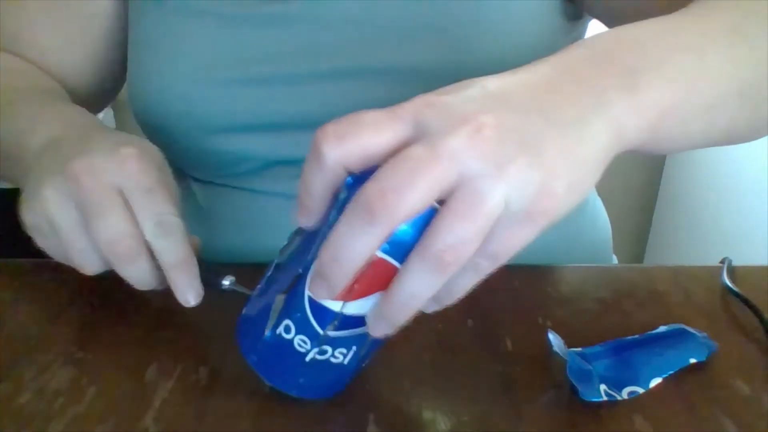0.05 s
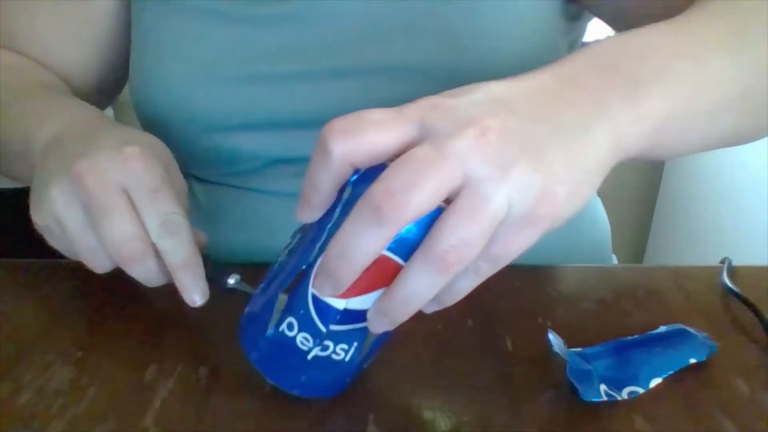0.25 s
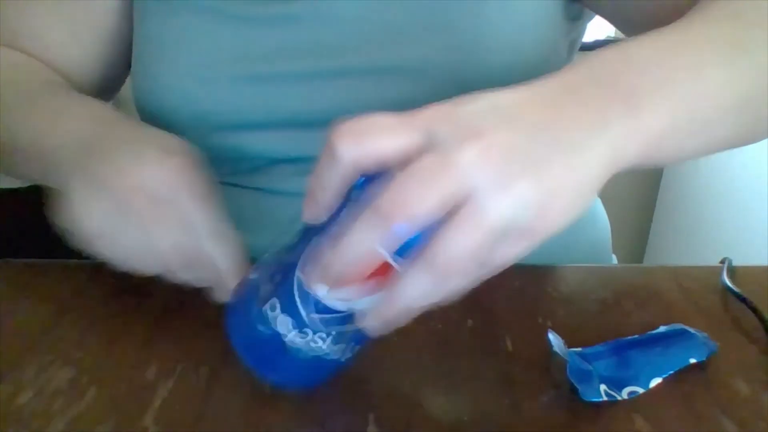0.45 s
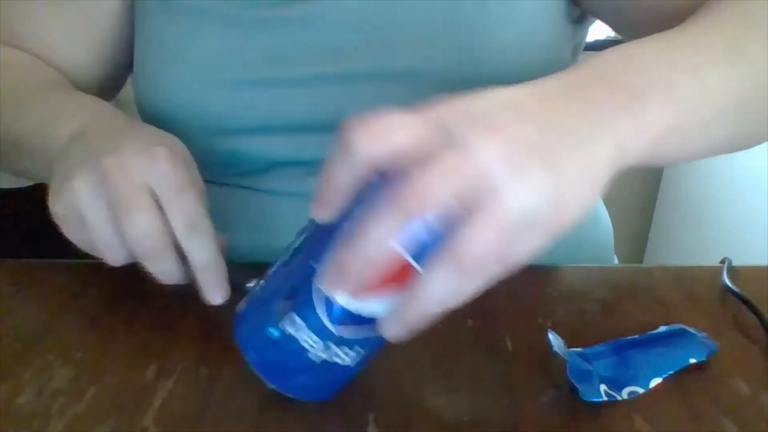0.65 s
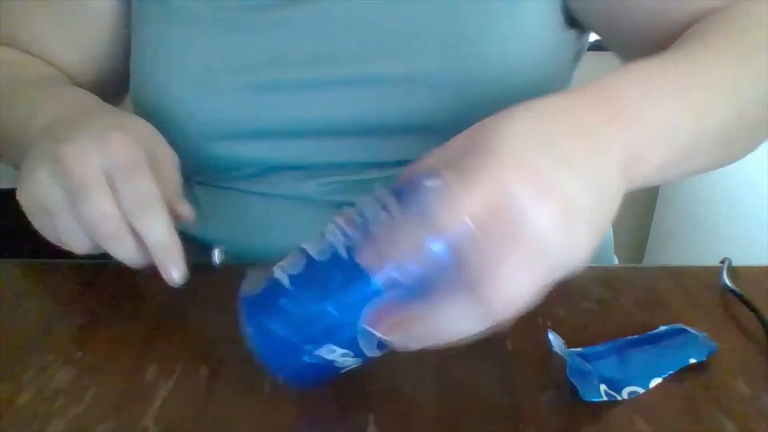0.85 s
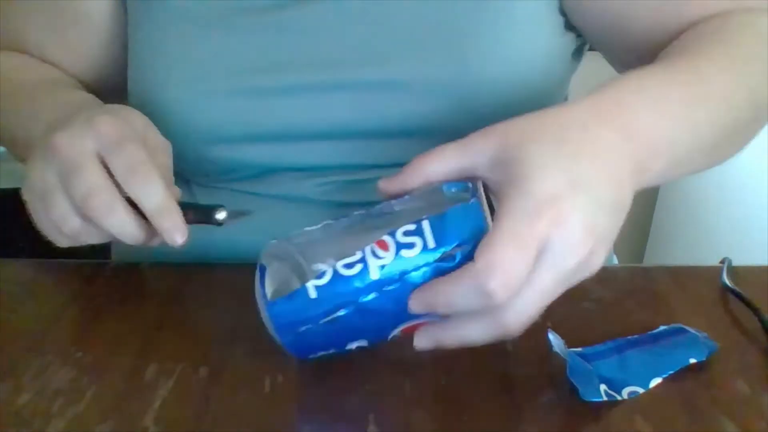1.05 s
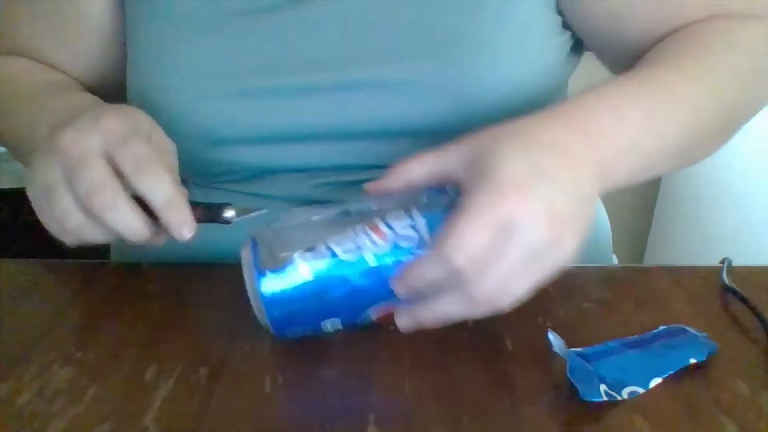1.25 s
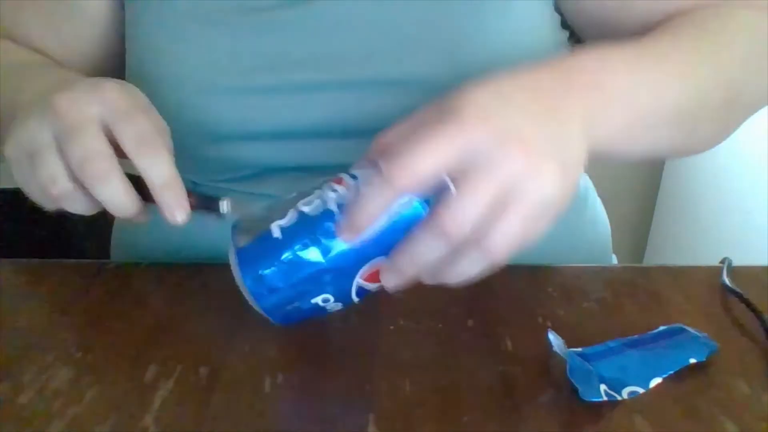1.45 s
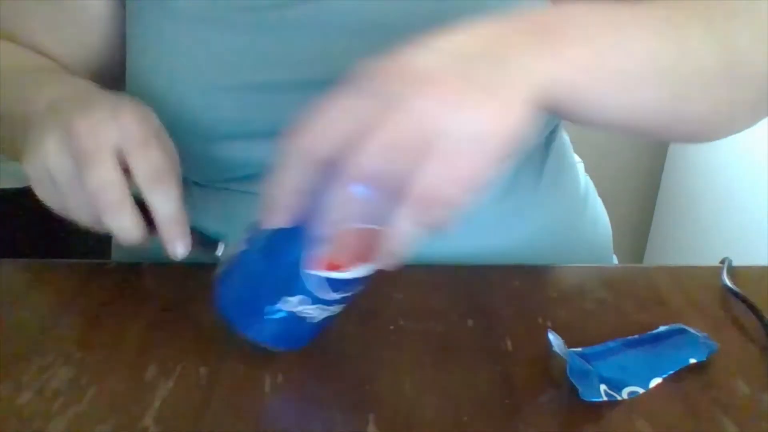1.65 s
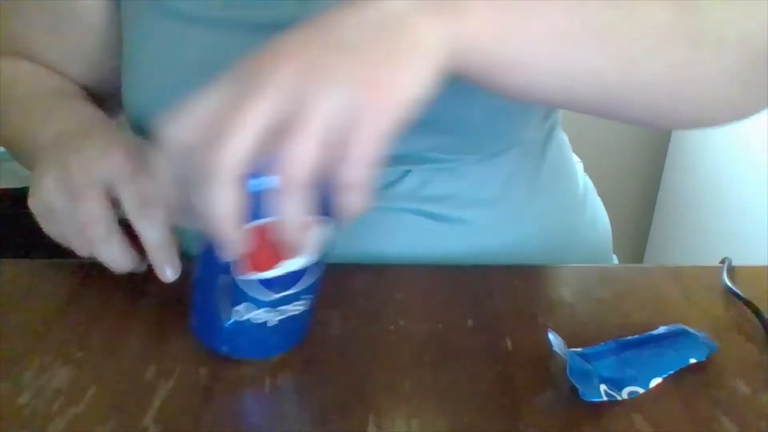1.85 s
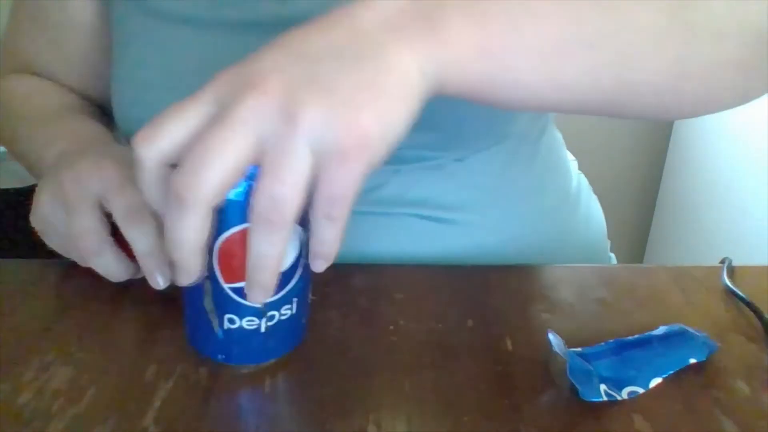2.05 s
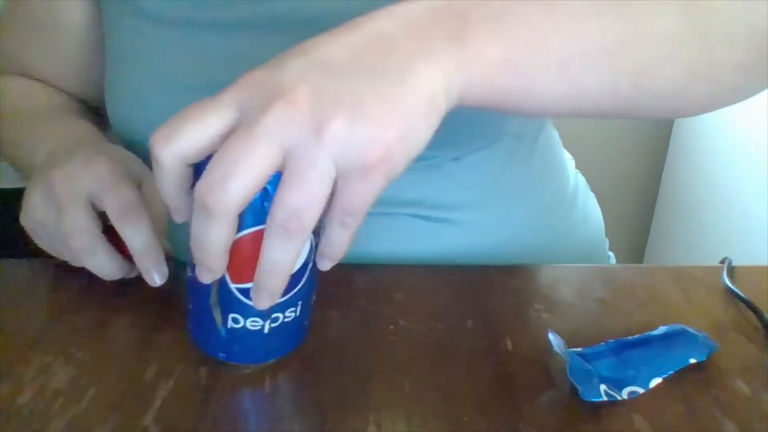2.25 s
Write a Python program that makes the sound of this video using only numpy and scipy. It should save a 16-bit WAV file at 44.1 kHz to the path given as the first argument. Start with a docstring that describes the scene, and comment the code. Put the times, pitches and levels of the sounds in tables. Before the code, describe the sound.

Close to the microphone in a quiet room, a cut-open metal can crackles and pops under a hand. Ringing taps and a few small clicks follow, then another crackle and a knock as it is stood on a wooden table.

```python
"""A faint hiss, an earlier hit dying away, lies over a low rumble; then comes a burst of sharp snaps.
An empty, cut-open drink can is squeezed and turned over on a wooden table in a quiet room,
close to one microphone. Its thin wall buckles, popping dents and a light click by the rim ring
briefly, and taps set the whole shell ringing. The can bumps the table and is set upright with a
thin swish of its rim. The room's tail and the rumble fade out at the end."""
import sys
import numpy as np
from scipy import signal
from scipy.fft import rfft, irfft, next_fast_len
from scipy.io import wavfile

SR = 44100
rng = np.random.default_rng(int(sys.argv[2]) if len(sys.argv) > 2 else 0)


def transcribe(signal):
    """Save signal, clipped to [-1, 1], as a 16-bit WAV file at the path in sys.argv[1]."""
    frames = np.atleast_2d(signal).T
    limited = np.clip(frames, -1, 1)
    pcm = np.round(limited * 32767).astype(np.int16)
    wavfile.write(sys.argv[1], SR, pcm)


N = 101429
TIME = np.arange(N) / SR

# The faint hiss of dying hits in the room. Each row: time in seconds, level in dB.
HISS_LEVELS = [(0, -42), (.03, -42), (.12, -52.5), (.2, -55.5), (.6, -43), (.72, -51.5), (.95, -53.5),
               (1.1, -61.5), (1.2, -69), (1.4, -60.5), (1.65, -65.5), (1.9, -63), (2.0, -61), (2.08, -75.5),
               (2.19, -79.5), (2.21, -110)]
# Colour of the hiss. Each row: frequency in Hz, relative level in dB.
HISS_SPECTRUM = [(300, -7.5), (600, -14.5), (950, 1), (1800, 1.5), (2800, -1.5), (4200, -5.5), (5600, -5.5),
                 (7000, -8), (7900, -21)]
# The low rumble. Each row: time in seconds, level in dB.
RUMBLE_LEVELS = [(0, -65.5), (.2, -54), (.5, -53.5), (.66, -52.5), (.8, -57.5), (1.03, -45.5), (1.1, -52.5),
                 (1.16, -50), (1.3, -53.5), (1.7, -58), (1.87, -54), (2.03, -63.5), (2.18, -65.5),
                 (2.205, -110)]
# Colour of the rumble. Each row: frequency in Hz, relative level in dB.
RUMBLE_SPECTRUM = [(25, -34.5), (60, -29.5), (90, -18), (125, 2.5), (190, 3), (290, 2.5), (400, -12),
                   (700, -12), (1200, -42)]
# The wall buckles. Each row: start in seconds, then relative levels in dB of four registers:
# hollow body, clack, tinny ring, crack.
WALL_SNAPS = [(0.2259,-56.5,-50,-47.5,-36.5),(.2402,-29.5,-24.5,-21,-16.5),(.244,-37,-19.5,-30,-9.5),(.249,-34.5,-17,-17,-39),(.261,-51,-17.5,-15,-11.5),(.273,-20.5,-16,-18.5,-10.5),(.279,-37,-35,-10.5,-10.5),(.293,-24.5,-45,-18.5,-15),(.306,-30,-48,-14.5,-13.5),(.339,-22.5,-27.5,-23,-29),(.368,-32,-37,-27.5,-49),(.392,-47,-52,-37.5,-56.5),(.421,-35.5,-33.5,-36,-36.5),(.462,-28,-24,-26,-33),(.4685,-25,-15.5,-17,-15),(.501,-25.5,-21,-15,-8),(.5457,-34.5,-37.5,-28,-24),(.5512,-37,-35.5,-24,-17),(0.646,-51,-56,-52.5,-46),(0.689,-50,-54,-57,-56),(.7474,-31.5,-23.5,-11.5,-12),(.757,-25.5,-24.5,-35.5,-30),(.775,-41.5,-32.5,-19.5,-33.5),(.789,-35,-39,-35,-39),(.955,-59,-61,-57,-51.5),(1.006,-47.5,-33.5,-49.5,-51),(1.021,-54.5,-37.5,-57,-57.5),(1.037,-64,-41.5,-46.5,-38.5),(1.073,-67.5,-58.5,-58.5,-52),(1.235,-59.5,-60,-57.5,-52),(1.2937,-59.5,-39.5,-23,-36),(1.414,-54,-39,-32.5,-43.5),(1.423,-52,-38.5,-28,-29.5),(1.427,-46,-32,-22.5,-28),(1.4329,-38,-30,-16,-19),(1.438,-29,-30,-18,-25.5),(1.451,-28,-22,-20.5,-22.5),(1.505,-19,-19.5,-29,-37.5),(1.745,-67,-53.5,-39.5,-29.5),(1.8444,-45,-45.5,-41,-50.5)]
# Those four registers. Each row: lower and upper edge in Hz, wall ring in dB, its t60 (time to
# fall 60 dB) in seconds, room tail in dB, its t60 in seconds.
SNAP_REGISTERS = [(304.6, 800, -7, .15, -35.5, 0.3), (788.4, 1600, -2, 0.17, -36, 0.68),
                  (1644.5, 5010, -4, 0.15, -25, 0.52), (4517, 7900, -8, 0.096, -38, 0.77)]
# Colour of the sheet metal. Each row: frequency in Hz, relative level in dB.
WALL_SPECTRUM = [(300, 0), (430, -6), (600, 7.5), (780, 4), (930, 1.5), (1200, 7), (1500, -1), (1700, 4.5),
                 (2050, 7.5), (2600, 8), (3050, 1), (3650, 6), (4150, -4.5), (4900, -6.5), (5600, -1),
                 (6500, -4), (7200, -9), (7700, -21.5), (7900, -23.5)]
# Brief pitched rings of the can. Each row: start in seconds, pitch in Hz, level in dB, t60 in seconds.
PITCHED_RINGS = [(.244, 1541, -14, .16), (.248, 3205, -5.5, 0.049), (.262, 4905, -21.5, 0.28),
                 (.273, 1415, -24.5, 0.19), (.28, 6260, -18, 0.13), (.28, 5580, -20.5, 0.15),
                 (.281, 2170, -21.5, 0.29), (.272, 1115, -19, 0.2), (.274, 1180, -28, .18),
                 (.279, 2045, -6.5, 0.051), (.281, 2590, -29.5, .28), (.305, 3620, -23, 0.17),
                 (.326, 1956, -20.5, .3), (.339, 1885, -25.5, 0.29), (.34, 2170, -25.5, .22),
                 (.341, 1760, -30.5, 0.41), (.342, 790, -36, 0.33), (.4665, 930, -15, .17),
                 (.469, 1130, -9, 0.063), (.4695, 1031, -23.5, .24), (.501, 6710, -4, 0.031),
                 (.5015, 6090, -5.5, 0.021), (.502, 3616, -22.5, .16), (.5015, 1878, -25.5, 0.31),
                 (.503, 2190, -28, 0.24), (.5515, 4900, -30, 0.13), (.5515, 5540, -28.5, .14),
                 (1.007, 1136, -31.5, 0.2), (1.008, 1433, -30, 0.099), (1.294, 3628, -21, 0.088),
                 (1.294, 2320, -32, 0.26), (1.294, 2290, -31, 0.16), (1.294, 1256, -35.5, 0.24),
                 (1.294, 1474, -32.5, 0.23), (1.294, 2620, -36, 0.19), (1.294, 5540, -39.5, 0.19),
                 (1.433, 1119, -21.5, 0.27), (1.4345, 586.4, -21.5, 0.28), (1.4385, 1478, -16, .13),
                 (1.451, 633, -27, 0.28), (1.4512, 2374, -18, 0.124), (1.846, 2525, -38.5, .13)]
# The can bumps the table. Each row: start in seconds, strength in dB, contact time in seconds.
TABLE_BUMPS = [(.259, -15, 0.0022), (.2755, -13, 0.00095), (.291, -14, 0.0056), (.364, -18.5, 0.0062),
               (.48, -35, .0015)]
# Modes of the wooden table. Each row: pitch in Hz, relative level in dB, t60 in seconds.
TABLE_MODES = [(87.4, -10.5, .13), (100.6, -4.5, 0.15), (165.6, -6.5, .2), (185.4, -8, .2), (246, -5, 0.14),
               (295, 4, .085), (373, -8.5, 0.13), (512, -12, 0.17)]
# Taps on the shell. Each row: start in seconds, strength in dB, wall stiffness as a pitch ratio.
SHELL_TAPS = [(0.748, -13.5, 0.99), (.7725, -21, 1.0)]
# Modes of the whole shell. Each row: pitch in Hz, relative level in dB, t60 in seconds.
SHELL_MODES = [(454, -15.5, .13), (593, -12.5, .11), (704.5, -4.5, .1), (940, -3.5, 0.14),
               (1266, 2.5, 0.075), (1232, -7.5, 0.091), (1499, -8, 0.094), (1809, -12, 0.25),
               (2080, -12.5, 0.23), (2230, -22.5, .16), (2610, -7, .15), (3846, -0.5, .09),
               (4000, -1.5, 0.065), (4550, -6.5, .16), (4550, -12, 0.1), (4610, -2, 0.091),
               (4926, -7, 0.15), (6400, -16.5, .09)]
# The base lands and rocks. Each row: start in seconds, strength in dB, contact time in seconds.
BASE_LANDINGS = [(1.505, -24, 0.00043), (1.522, -17.5, 0.0011), (1.536, -30, 0.0016),
                 (1.846, -42.5, 0.0013)]
# Modes of the base. Each row: pitch in Hz, relative level in dB, t60 in seconds.
BASE_MODES = [(178, -19.5, 0.11), (290.8, -0.5, 0.12), (429, -14.5, 0.13), (594, -13, 0.16),
              (707, -3, 0.12), (772, -3, .15), (1120, -10, 0.15), (1172, -7, 0.097), (1203, -1, 0.096)]
# Colour of the sliding rim. Each row: frequency in Hz, relative level in dB.
SLIDE_SPECTRUM = [(3500, -34), (4400, -26), (4750, 0.5), (5300, -22), (6200, 1.5), (6900, -10.5),
                  (7600, -1), (8000, -23), (8500, -11.5)]

TICKS_PER_S, TICK_DB = 250, -9.5
ATTACK_S = 0.00088  # a short rise that softens the onset of each crack and ring
SNAP_DB, CRACK_DB, CRACK_T60_S, ECHO_DB, ECHO_T60_S = -0.5, -0.5, 0.042, -11, 0.073
MODE_SPREAD_DB, DAMPING_SPREAD_DB = 3, 0.85
FLUTTER, FLUTTER_PER_S = 0.55, 77  # how much and how fast each ring flutters in the room
WALL_LOW_HZ, RING_LOW_HZ = 270, 314  # the snaps and rings carry no deep bass


def from_db(db):
    """Decibels to gain."""
    return 10 ** (np.asarray(db) / 20)


def fade(t60):
    """Exponential decay from the first sample on."""
    return from_db(-60 * np.minimum(TIME / t60, 4))


def rise(t):
    """The brief onset of a crack or ring."""
    return 1 - np.exp(-t / ATTACK_S)


def add(out, s, sound):
    """Mix a sound in from s seconds."""
    start = int(s * SR)
    part = sound[:N - start]
    out[start:start + len(part)] += part


def level(rows):
    """A dB curve as a gain over time."""
    return from_db(np.interp(TIME, *np.transpose(rows)))


def high_pass(x, hz):
    """Take away the bass."""
    return signal.sosfilt(signal.butter(3, hz, "high", fs=SR, output="sos"), x)


def coloured(source, spectrum, low=20, high=7900):
    """Give a source a spectrum between two edges in Hz; rms 1."""
    size = next_fast_len(N)
    hz = np.arange(size // 2 + 1) * SR / size + 1e-9
    points, db = np.transpose(spectrum)
    colour = from_db(np.interp(np.log(hz), np.log(points), db))
    edge_loss = np.sqrt((1 + (low / hz) ** 16) * (1 + (hz / high) ** 24))
    x = irfft(rfft(source, size) * colour / edge_loss, size)[:N]
    return x / x.std()


def ring(hz, db, t60, flutter=0, length_s=0.7):
    """One struck mode; flutter makes its strength and phase waver."""
    t = TIME[TIME < length_s]
    knots = rng.standard_normal((2, 200))
    swell, skew = (flutter * np.interp(t * FLUTTER_PER_S, np.arange(len(k)), k) for k in knots)
    phase = 2 * np.pi * hz * t
    tone = ((1 + swell) * np.sin(phase) + skew * np.cos(phase)) / np.sqrt(1 + flutter ** 2)
    return rise(t) * from_db(db - 60 * t / t60) * tone


def faint_hiss():
    """Hiss with tiny ticks: an earlier hit dying away, then the room's tail after the snaps."""
    ticks = (rng.random(N) < TICKS_PER_S / SR) * rng.standard_normal(N)
    hiss = coloured(rng.standard_normal(N), HISS_SPECTRUM)
    return level(HISS_LEVELS) * (hiss + from_db(TICK_DB) * coloured(ticks, HISS_SPECTRUM))


def low_rumble():
    """Low noise swells and sinks underneath the can."""
    return level(RUMBLE_LEVELS) * coloured(rng.standard_normal(N), RUMBLE_SPECTRUM)


def wall_snaps():
    """Each buckle is a noisy crack, the ring of the wall, close echoes and a faint room tail."""
    out = np.zeros(N)
    snaps = np.array(WALL_SNAPS)
    starts = snaps[:, 0]
    for k, (low, high, ring_db, ring_t60, room_db, room_t60) in enumerate(SNAP_REGISTERS):
        dbs = SNAP_DB + snaps[:, k + 1]
        noise = coloured(rng.standard_normal(N), WALL_SPECTRUM, low, high)
        crack = from_db(CRACK_DB) * fade(CRACK_T60_S)
        echoes = from_db(ECHO_DB) * fade(ECHO_T60_S)
        room = from_db(room_db) * fade(room_t60)
        envelope = rise(TIME) * np.sqrt(crack ** 2 + echoes ** 2 + room ** 2)
        for s, db, shift in zip(starts, dbs, rng.integers(0, N, len(starts))):
            add(out, s, from_db(db) * envelope * np.roll(noise, shift))
        out += wall_ring(starts, dbs + ring_db, low, high, ring_t60, count=(12, 20, 56, 44)[k])
    return high_pass(out, WALL_LOW_HZ)


def wall_ring(starts, dbs, low, high, t60, count):
    """Crowded modes of the sheet in one register; every snap strikes each with its own strength."""
    pitches = low + (high - low) * (np.arange(count) + rng.random(count)) / count
    colour_db = np.interp(pitches, *np.transpose(WALL_SPECTRUM))
    gains = from_db(colour_db + MODE_SPREAD_DB * rng.standard_normal(count))
    strengths = gains * rng.standard_normal((len(starts), count))
    snap_rms = np.sqrt(np.sum(strengths ** 2, axis=1, keepdims=True) / 2)
    strengths *= from_db(dbs)[:, None] / snap_rms
    mode_t60s = t60 * from_db(DAMPING_SPREAD_DB * rng.standard_normal(count))
    out = np.zeros(N)
    for hz, strength, mode_t60 in zip(pitches, strengths.T, mode_t60s):
        clicks = np.full(N, 1e-18)
        clicks[(starts * SR).astype(int)] = strength
        radius, angle = from_db(-60 / (mode_t60 * SR)), 2 * np.pi * hz / SR
        out += signal.lfilter([0, np.sin(angle)], [1, -2 * radius * np.cos(angle), radius ** 2], clicks)
    return out


def pitched_rings():
    """The can rings briefly at single pitches, from popping dents and a light click by the rim."""
    out = np.zeros(N)
    for s, hz, db, t60 in PITCHED_RINGS:
        add(out, s, ring(hz, db, t60, FLUTTER))
    return high_pass(out, RING_LOW_HZ)


def knocks(blows, modes):
    """Can meets table: smooth pushes set wood or base ringing; a longer contact is duller."""
    out = np.zeros(N)
    body = sum((-1) ** k * ring(*mode) for k, mode in enumerate(modes))
    for s, db, contact_s in blows:
        push = np.sin(np.pi * TIME[TIME < contact_s] / contact_s) ** 2
        add(out, s, from_db(db) * signal.fftconvolve(body, push / push.sum()))
    return out


def shell_taps():
    """A tap sets all the modes of the shell ringing at once."""
    out = np.zeros(N)
    for s, db, pitch_ratio in SHELL_TAPS:
        for k, (hz, mode_db, t60) in enumerate(SHELL_MODES):
            add(out, s, (-1) ** k * ring(hz * pitch_ratio, db + mode_db, t60, FLUTTER))
    return high_pass(out, RING_LOW_HZ)


def rim_slide(peak_s=1.707, rise_s=0.0097, fall_s=0.021, peak_db=-39.5):
    """The rim slides as the can tips upright: a thin swish that swells and dies."""
    swell = np.exp(-np.maximum((peak_s - TIME) / rise_s, (TIME - peak_s) / fall_s))
    swish = coloured(rng.standard_normal(N), SLIDE_SPECTRUM, low=3540, high=8700)
    return from_db(peak_db) * swell * swish


def scene():
    """Rumble, can and table in a quiet room, at one close microphone."""
    rumble = low_rumble()
    metal = wall_snaps() + pitched_rings() + shell_taps()
    bumps = knocks(TABLE_BUMPS, TABLE_MODES)
    landings = knocks(BASE_LANDINGS, BASE_MODES)
    return (rumble + metal + bumps + landings + rim_slide() + faint_hiss())[None]


def record(dry, low_cut_hz=87, overload=0.9, high_cut_hz=8700):
    """After the microphone the bass is cut, the loudest peaks are rounded and the top is cut."""
    x = high_pass(dry, low_cut_hz)
    rounded = x / (1 + (x / overload) ** 4) ** .25
    return signal.sosfiltfilt(signal.butter(12, high_cut_hz, fs=SR, output="sos"), rounded)


dry = scene()
out = record(dry)
transcribe(out)
```